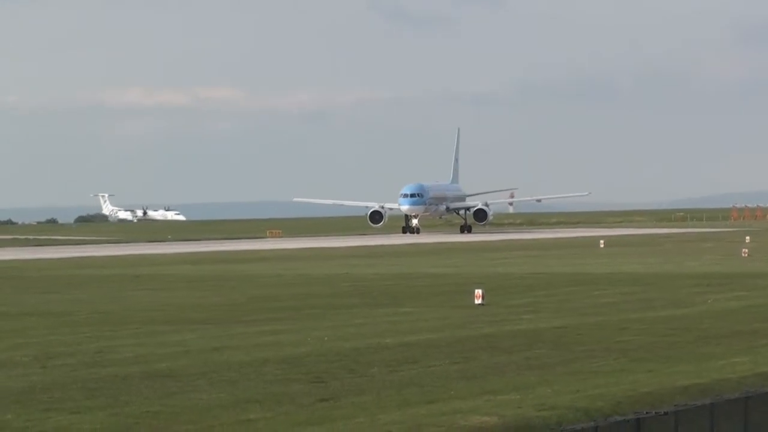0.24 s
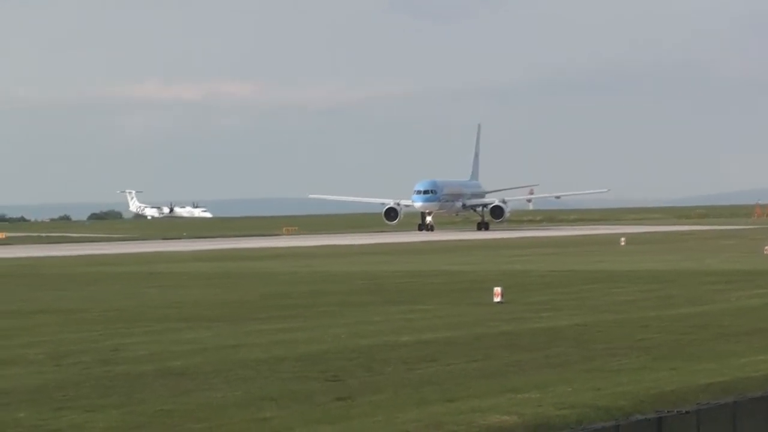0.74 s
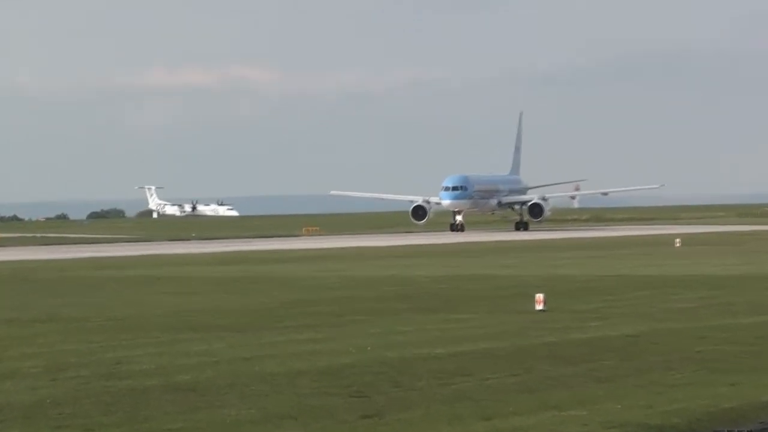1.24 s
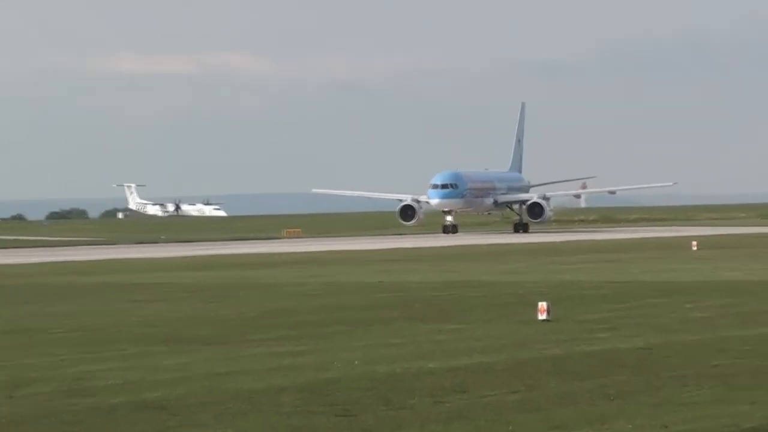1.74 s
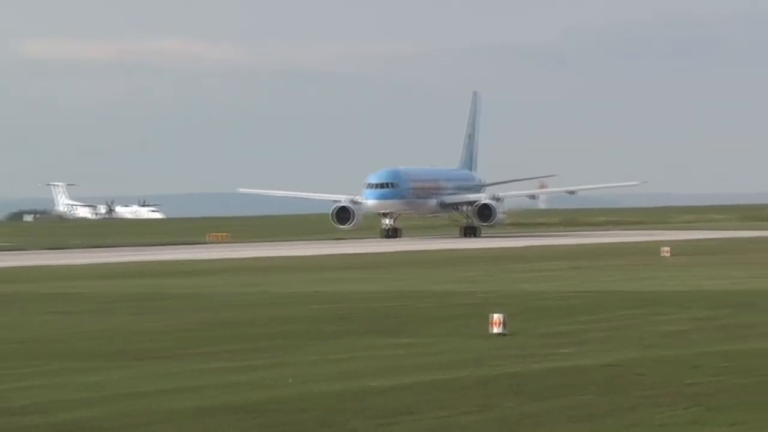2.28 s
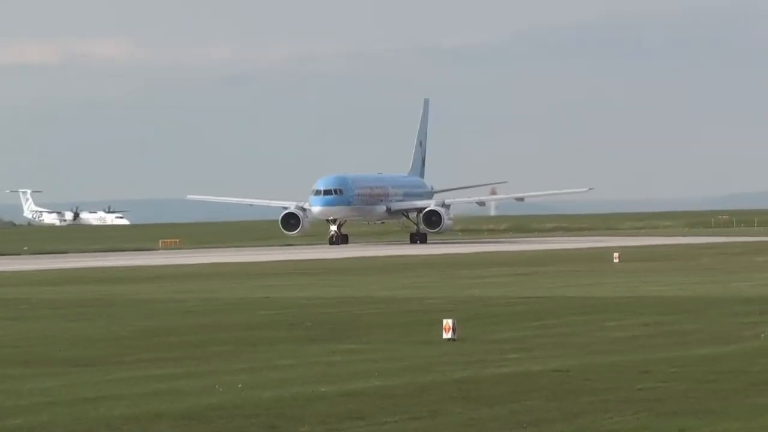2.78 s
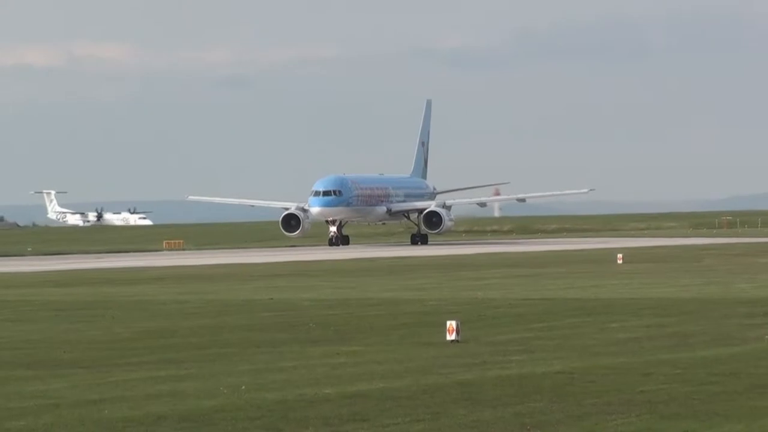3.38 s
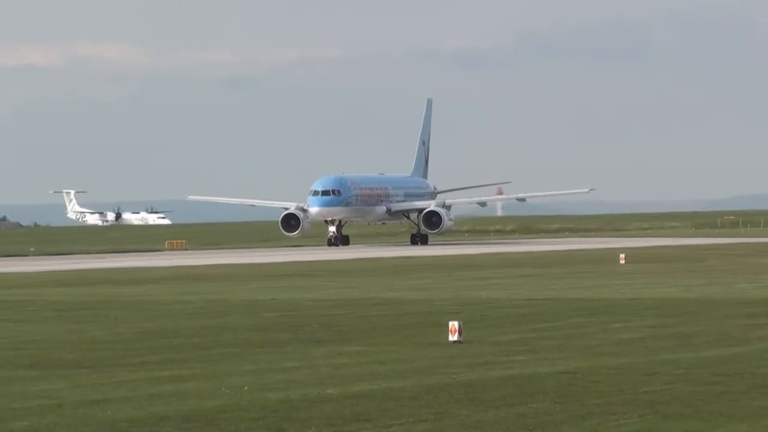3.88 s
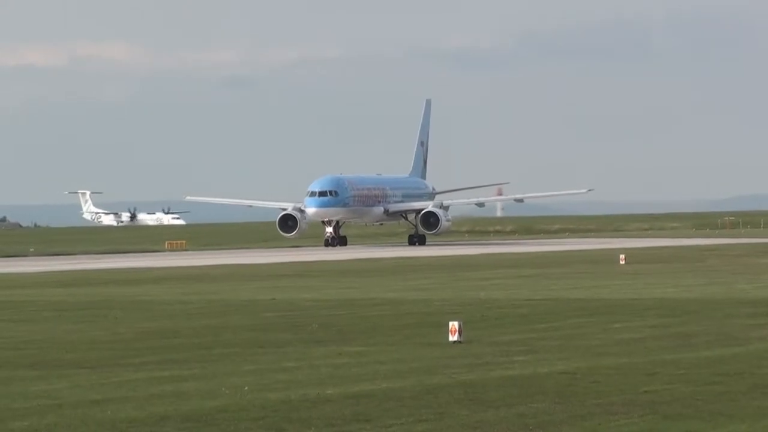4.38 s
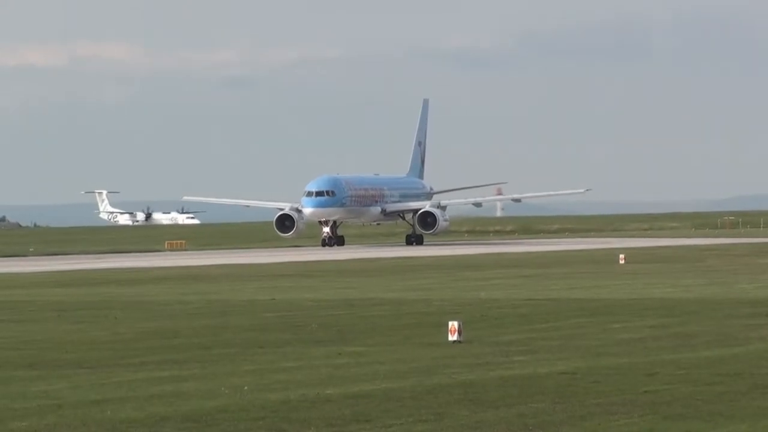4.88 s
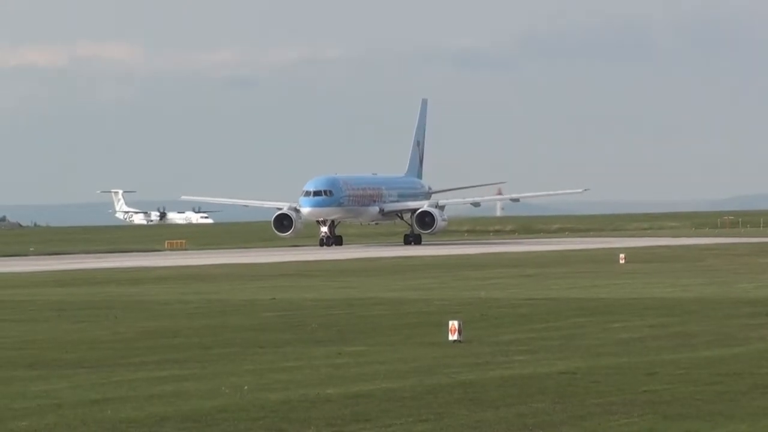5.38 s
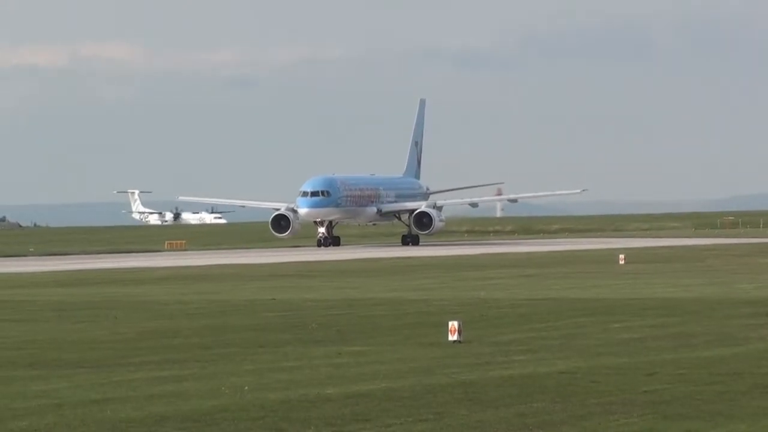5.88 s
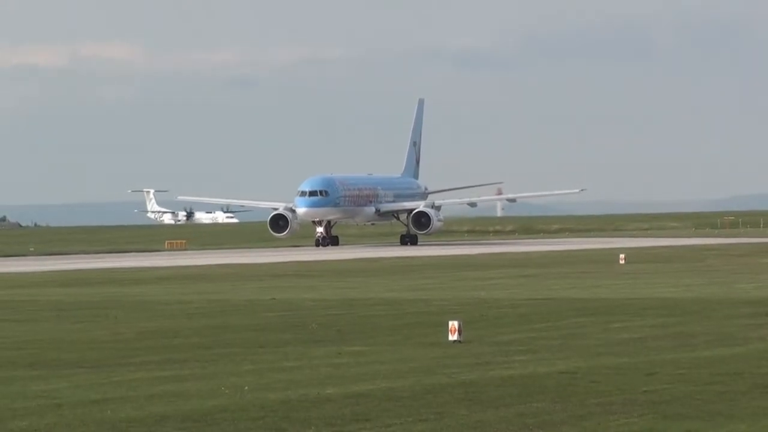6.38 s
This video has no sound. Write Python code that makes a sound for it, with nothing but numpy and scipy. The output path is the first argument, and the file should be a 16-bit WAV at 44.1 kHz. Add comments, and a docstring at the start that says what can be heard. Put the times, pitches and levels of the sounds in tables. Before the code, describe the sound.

Strong gusty wind buffets and pops on an unprotected microphone while a distant twin-jet airliner runs its engines with a thin, wavering high whine.

```python
"""A twin-jet airliner runs its engines up on a runway, a few hundred metres away, in gusty wind.
From the start filtered-noise roar and intake hiss carry a whine of wandering blade tones; gusts rumble over them,
eddies pop on two microphone ports, thickest in the first two seconds, and dry noise ticks fall mostly early.
The engines swell until past three seconds as a faint wide hiss rises, then sag after four.
They return towards the end, while the gusts, random kicks coloured low and lumpy, keep coming."""
import sys
import numpy as np
from scipy import signal
from scipy.fft import rfft, irfft, next_fast_len
from scipy.io import wavfile
from scipy.ndimage import uniform_filter1d, map_coordinates

SR = 44100
rng = np.random.default_rng(int(sys.argv[2]) if len(sys.argv) > 2 else 0)


def bounce(signal):
    """Save signal as a 16-bit WAV file at the path given by the first command-line argument."""
    frames = np.transpose(np.atleast_2d(signal))
    limited = np.clip(frames, -1, 1)
    pcm = np.round(limited * 32767).astype(np.int16)
    wavfile.write(sys.argv[1], SR, pcm)


N = 292868


# how strongly the air carries the engines, before the trims in the mix:
# (time [s], roar level [dB], intake hiss level [dB])
ENGINE_LEVELS = [(0.0, -49.5, -52.5), (0.28, -53.5, -53.5), (1.14, -48.5, -53.5), (1.52, -49, -53),
                 (1.66, -49.5, -53), (1.85, -52, -51), (2.11, -48, -47.5), (2.79, -46, -47),
                 (2.94, -46.5, -48.5), (3.16, -46, -44), (3.42, -48, -47), (3.5, -49.5, -49),
                 (3.62, -49, -49.5), (4.35, -46, -48), (4.41, -50, -53), (4.94, -51.5, -52),
                 (5.55, -50.5, -51), (5.68, -50.5, -49.5), (6.4, -47, -44.5), (6.64, -44.5, -48)]
# tone colour of the exhaust roar: (frequency [Hz], relative density [dB per Hz])
ROAR_SPECTRUM = [(60, -4), (300, 8.5), (700, 1), (1100, 3), (1400, 1), (2000, 1), (2400, -2.5), (2800, -5),
                 (3200, -13), (4500, -34.5), (8000, -59)]
# tone colour of the intake hiss: (frequency [Hz], relative density [dB per Hz])
INTAKE_SPECTRUM = [(2200, -25), (3000, -8), (3300, -1), (3700, -1), (4100, -5), (4500, -7.5), (4800, -11),
                   (5300, -16), (6000, -18.5), (6800, -28.5), (9000, -35.5), (12000, -53)]
# engine sound at the two ports: (frequency [Hz], coherence [0-1], left minus right [dB], left lead [rad])
ENGINE_PORTS = [(200, 0.38, -7.5, 0.016), (1000, 0.56, -7, 0.21), (2000, .68, -4.5, 0.079),
                (3000, 0.81, -8, .1), (3800, .88, -7, .28), (5200, 0.69, -7, .25), (7000, .1, 4.5, 0.023)]


def jet_noise():
    """Exhaust roar and intake hiss, made patchy by the turbulent air on the way."""
    roar_db, intake_db = curves(ENGINE_LEVELS)
    roar_noise = patchy(depth_db=1.74, bin_count=4, frame_count=30)
    roar = heard(roar_noise, ROAR_SPECTRUM, ENGINE_PORTS)
    intake_noise = patchy(depth_db=1.6, bin_count=4, frame_count=24)
    intake = heard(intake_noise, INTAKE_SPECTRUM, ENGINE_PORTS)
    return amp(roar_db + 3.0) * roar + amp(intake_db - 4.5) * intake


# local swells and a few dips in the engine noise, some gliding in pitch: (time [s], half length [s],
# centre [Hz], half width [octaves], glide [octaves per s], gain before the noise is levelled [dB])
NOISE_SWELLS = [(1.205, 0.12, 2000, 0.14, 0, 4.5), (1.534, 0.06, 4600, .5, 0, 4),
                (2.03, .06, 2040, .07, 0, 3.5), (2.174, 0.078, 3460, 0.18, 0.078, 7),
                (2.178, 0.055, 1020, 0.083, 0, 6), (2.302, .09, 1930, .07, 0, 7),
                (2.649, 0.2, 2000, 0.081, 0, 3.5), (2.554, 0.69, 2460, 0.27, -0.33, 4),
                (3.36, .17, 3330, .055, -0.87, 9.5), (2.75, .25, 3720, .08, 0, 2.5),
                (3.87, .05, 5200, .25, 0, 3), (3.411, 0.046, 4400, 0.087, 0, 9),
                (3.36, 0.18, 1000, .17, -0.03, 10), (4.096, 0.32, 1098, 0.16, 0, 7.5),
                (3.661, .09, 1890, .2, 0.076, -4), (2.67, .025, 2040, .04, -1, 6),
                (2.78, .1, 5900, .2, 0, -3), (3.56, .04, 5500, .3, 0, -3),
                (4.608, 0.083, 3390, .04, -0.067, 11), (4.9, .15, 5500, 0.22, 0, 2),
                (4.949, 0.27, 2110, .22, 0, -3.5), (5.52, 0.07, 2000, 0.14, .5, 5),
                (5.953, 0.076, 2400, 0.098, 0, 6.5), (6.248, 0.12, 3760, .12, -.7, 7.5),
                (6.421, .12, 5200, .15, 0, 2.5)]


def patchy(depth_db, bin_count, frame_count):
    """Two noises whose gain drifts in patches of time and frequency, with marked swells and dips."""
    hz, t, bins = signal.stft(rng.standard_normal((2, N)), SR, nperseg=512)
    field = rng.standard_normal(bins.shape[1:])
    for _ in range(2):
        field = uniform_filter1d(field, bin_count, 0)
        field = uniform_filter1d(field, frame_count, 1)
    gain_db = depth_db * unit(field)
    for s, length, centre_hz, width, glide, db in NOISE_SWELLS:
        octaves = np.log2((hz[:, None] + 1) / centre_hz) - glide * (t - s)
        gain_db = gain_db + db * np.exp(-((t - s) / length) ** 2 - (octaves / width) ** 2)
    return signal.istft(bins * amp(gain_db), nperseg=512)[1][:, :N]


# two shafts settle at their own pace; only each pitch against its median is played:
# (time [s], fan tone [Hz], compressor tone [Hz])
SHAFT_PITCH = [(0, 1838.5, 4540), (1.5, 1837, 4531), (2.7, 1835.5, 4523), (4.5, 1833.5, 4520),
               (6.64, 1831.5, 4517)]
# main tones, pitched at median shaft speed: name -> (shaft, frequency [Hz], pitch wander [Hz],
# offset of a beating side tone [Hz], its level against the direct tone [dB], scattered share [ratio])
MAIN_TONES = {"fan": ("fan", 1835, 4, 19, -16, .45), "shaft": ("fan", 1985, 3, 20, -16, .28),
              "upper shaft": ("fan", 2093, 3.5, -23, -6, .28), "fan octave": ("fan", 3669, 3, 38, -11, .26),
              "blade": ("fan", 3890, 3, 33, -12, .3),
              "fan side tone": ("compressor", 3969, 2.5, 38, -10, .3),
              "low compressor": ("compressor", 4181, 4, -35, -16, .27),
              "other engine's low compressor": ("compressor", 4208, 5, 35, -20, .4),
              "middle compressor": ("compressor", 4343, 2.5, 20, -16, .35),
              "high compressor": ("compressor", 4522, 2, 14, -25, .14),
              "turbine": ("compressor", 5277, 5, 20, -12, .42)}
# weaker tones of the fan shaft, before the trim in the mix: (frequency [Hz], level [dB])
WEAK_TONES = [(2070, -72), (2178, -73), (2266, -74), (3600, -71), (3709, -73), (3842, -67), (4146, -69.5),
              (5451, -84.5), (6010, -93)]
# each tone is beamed its own way and drifts as the aircraft turns: name -> (level at mid-scene with
# average intake hiss [dB], follow [dB per dB of intake hiss], drift [dB per s])
TONE_BEAMS = {"fan": (-60.5, 0.62, 0), "shaft": (-66, 1, -.3), "upper shaft": (-69.5, 1.1, -.5),
              "fan octave": (-61.5, 1.58, -1), "blade": (-63.5, 1.1, -.4),
              "fan side tone": (-64.5, 0.65, .6), "low compressor": (-61, 1, 1),
              "other engine's low compressor": (-66.5, .8, 2), "middle compressor": (-73.5, .6, 2.6),
              "high compressor": (-65.5, 0.4, 1.9), "turbine": (-79, 2.1, 0)}


def whine():
    """Blade tones sink slightly as the shafts settle; two engines a little apart in speed make them beat."""
    fan_hz, compressor_hz = curves(SHAFT_PITCH)
    speed = {"fan": fan_hz / np.median(fan_hz), "compressor": compressor_hz / np.median(compressor_hz)}
    intake_db = curves(ENGINE_LEVELS)[1]
    carry_db = intake_db - intake_db.mean()
    from_middle_s = (np.arange(N) - N / 2) / SR
    strong = 0
    for name, (shaft, hz, wander_hz, offset_hz, twin_db, scatter) in MAIN_TONES.items():
        db, follow, drift = TONE_BEAMS[name]
        level_db = db + follow * carry_db + drift * from_middle_s + flare_db(name)
        twin_phase = 2 * np.pi * np.cumsum(offset_hz + 4 * wobble(12)) / SR
        twin = amp(twin_db) * np.exp(1j * twin_phase)
        voice = tone(hz, speed[shaft], wander_hz, fade_db=1.5, scatter=scatter, twin=twin)
        strong = strong + amp(level_db) * voice
    weak = 0
    for hz, db in WEAK_TONES:
        weak = weak + amp(db) * tone(hz, speed["fan"], wander_hz=3.6, fade_db=3.5, scatter=0.45)
    return strong + weak * amp(1.1 * carry_db + 2.2)


def tone(hz, speed, wander_hz, fade_db, scatter, twin=0):
    """One blade tone at both ports: turbulence blurs its pitch and makes it twinkle."""
    phase = 2 * np.pi * np.cumsum(hz * speed + wander_hz * wobble(45)) / SR
    direct = amp(fade_db * wobble(14))
    # sound scattered by eddies arrives with shifting phase and beats against the direct path
    shared = wobble(70) + 1j * wobble(70)
    own_to_each_port = np.array([wobble(30), wobble(30)])
    scattered = scatter * (shared + own_to_each_port)
    _, balance_db, lead = along(ENGINE_PORTS, hz)
    tilt = amp(balance_db / 2) * np.exp(.5j * lead)
    ports = np.array([[tilt], [1 / tilt]])
    return unit(np.real(ports * (direct + twin + scattered) * np.exp(1j * phase)))


# moments when one tone rings out or drops away: (middle [s], half length [s], tone name, gain [dB])
TONE_FLARES = [(1.4, .14, "fan", 6), (2.24, 0.056, "fan", 10.5), (2.8, 0.44, "fan", 2.5),
               (3.47, .07, "fan", 4), (3.63, .07, "fan", -10), (3.874, 0.053, "fan", 10.5),
               (4.02, 0.068, "fan", 5.5), (4.7, 0.14, "fan", -6), (5.33, .075, "fan", 7),
               (5.5, 0.055, "fan", 6.5), (5.76, 0.14, "fan", -7), (6.47, 0.18, "fan", 3.5),
               (2.09, 0.091, "shaft", 9), (2.6, .25, "shaft", 2), (5.63, 0.11, "shaft", 5),
               (2.1, .11, "upper shaft", 6), (2.62, 0.17, "upper shaft", 11), (2.92, .12, "upper shaft", 9),
               (0.597, 0.12, "fan octave", 7.5), (1.102, .07, "fan octave", -9),
               (1.41, 0.19, "fan octave", 11.5), (1.84, .05, "fan octave", 3),
               (2.308, .03, "fan octave", -3), (2.437, .08, "fan octave", 5.5),
               (2.72, 0.17, "fan octave", 6.5), (2.97, 0.076, "fan octave", 7.5),
               (3.2, 0.13, "fan octave", 5.5), (3.52, 0.04, "fan octave", 6), (1.57, 0.11, "blade", 10),
               (2.65, .3, "blade", 3), (0.194, 0.15, "fan side tone", 9), (1.126, .07, "fan side tone", 9),
               (3.8, .13, "turbine", 6), (3.87, .05, "turbine", 4), (.2, .25, "low compressor", -3),
               (2.3, 0.13, "low compressor", 8.5), (2.753, 0.35, "low compressor", 3.5),
               (3.238, 0.1, "low compressor", 5.5), (3.64, .04, "low compressor", -9),
               (4.03, 0.05, "low compressor", 9), (4.203, 0.061, "low compressor", 6),
               (4.47, 0.038, "low compressor", 7), (5.067, .04, "low compressor", 8),
               (5.722, 0.092, "low compressor", 7), (6.33, .06, "low compressor", -5),
               (6.49, .05, "low compressor", 2), (1.99, .08, "high compressor", 6.5),
               (3.2, .12, "high compressor", 4.5), (3.415, .045, "high compressor", 11.5),
               (3.62, 0.07, "high compressor", -7), (3.87, 0.044, "high compressor", 3),
               (4.7, .06, "high compressor", 5.5), (5.5, .2, "high compressor", -4),
               (6.08, 0.09, "high compressor", 8), (6.26, .04, "high compressor", -5),
               (6.53, .19, "high compressor", 8.5)]
FLARE_EDGE_S = 0.02  # time scale of the move into and out of a flare


def flare_db(name):
    """Now and then the air focuses one tone on the listener or bends it away: it moves, holds, comes back."""
    t = np.arange(N) / SR
    total_db = 0
    for s, length, which, db in TONE_FLARES:
        if which == name:
            total_db = total_db + db * (1 + np.tanh((length - np.abs(t - s)) / FLARE_EDGE_S)) / 2
    return total_db


# gusts, before lumps and trims: (start [s], hold [s], buffet level [dB], flutter against buffet [dB])
WIND_GUSTS = [(0.0, 0.19, -26, -8), (0.351, 0.049, -19, -12), (0.546, 0.29, -23.5, -8.5),
              (0.919, 0.11, -24, -7), (1.151, 0.21, -23.5, -11.5), (1.446, 0.14, -24, -5.5),
              (1.791, 0.028, -30, -11.5), (1.908, 0.08, -25, -12), (2.068, 0.084, -31, -11),
              (2.205, 0.073, -25, -9), (2.3, 0.12, -28, -7), (2.511, 0.007, -33.5, -1.5),
              (2.79, .04, -27.5, -8), (2.886, 0.083, -22.5, -7.5), (3.056, 0.23, -30, -10.5),
              (3.383, 0.068, -19.5, -13), (3.524, 0.08, -25.5, -12.5), (3.835, 0.055, -24.5, -12.5),
              (3.974, 0.13, -24.5, -14), (4.175, 0.089, -25.5, -16), (4.325, 0.062, -20.5, -10),
              (4.42, 0.35, -26.5, -11), (4.857, 0.095, -29.5, -11.5), (5.036, 0.16, -29, -12.5),
              (5.254, 0.33, -26.5, -16), (5.484, 0.27, -27, -13.5), (5.812, 0.18, -25.5, -15),
              (6.064, 0.14, -22.5, -13.5), (6.267, 0.098, -22, -10.5), (6.428, 0.14, -22.5, -11.5)]
# tone colour of the deep buffet: (frequency [Hz], relative density [dB per Hz])
BUFFET_SPECTRUM = [(8, -16.5), (25, -14), (55, -5), (95, 1), (150, 0), (250, -8), (400, -22), (800, -36.5),
                   (2000, -88.5)]
# tone colour of the sharper flutter: (frequency [Hz], relative density [dB per Hz])
FLUTTER_SPECTRUM = [(100, -22.5), (220, -1), (330, 1), (480, -3.5), (750, -13.5), (1200, -22),
                    (2500, -30.5), (5000, -45), (9000, -76.5)]
# wind at the two ports: (frequency [Hz], coherence [0-1], left minus right [dB], left lead [rad])
WIND_AT_PORTS = [(20, .65, -12.5, -.2), (50, 1, -10.5, -0.79), (101, 0.73, -2, -0.73),
                 (175, 0.56, 2, -0.93), (270, 0.26, 6, -0.095), (500, .45, 4, -0.063),
                 (1500, 0.4, 5.5, -0.22)]
BREEZE_DB, BREEZE_FLUTTER_DB = -33, -43  # floor between gusts, before lumps and trims


def wind():
    """Eddies break on the ports: a deep buffet, and sharper kicks that flutter above it; the strongest flow rules."""
    buffet_gain, flutter_gain = amp(BREEZE_DB), amp(BREEZE_FLUTTER_DB)
    for start, length, db, flutter_db in WIND_GUSTS:
        gust = amp(db) * gust_shape(start, length)
        buffet_gain = np.maximum(buffet_gain, gust)
        flutter_gain = np.maximum(flutter_gain, gust * amp(flutter_db))
    kicks = eddies(rate=480, spread_db=3)
    buffet = heard(0.48 * kicks + rng.standard_normal((2, N)), BUFFET_SPECTRUM, WIND_AT_PORTS)
    flutter = heard(kicks + 0.51 * rng.standard_normal((2, N)), FLUTTER_SPECTRUM, WIND_AT_PORTS)
    lumps_db = 1.72 * wobble(40) + stall_db()
    return amp(lumps_db - 0.32) * buffet_gain * buffet + amp(lumps_db - 0.08) * flutter_gain * flutter


GUST_ATTACK_S, GUST_RELEASE_S = 0.093, 0.074  # time constants of build-up and dying away


def gust_shape(start, length):
    """A gust builds up exponentially, holds and dies away."""
    t = np.arange(N) / SR
    before = np.maximum(start - t, 0)
    after = np.maximum(t - start - length, 0)
    return np.exp(-before / GUST_ATTACK_S - after / GUST_RELEASE_S)


def eddies(rate, spread_db):
    """Random pressure kicks of either sign, rate a second at each port, some much larger than the rest."""
    hit = rng.random((2, N)) < rate / SR
    size_db = spread_db * np.minimum(rng.standard_normal((2, N)), 2)
    return unit(hit * rng.choice([-1, 1], (2, N)) * amp(size_db))


# brief changes in the wind, nearly all lulls: (middle [s], half length [s], gain [dB])
WIND_LULLS = [(0.236, 0.016, -1), (0.49, 0.0062, -2.5), (1.126, 0.0057, -13), (1.723, 0.061, 0),
              (2.48, 0.015, -5), (2.674, 0.034, -3), (3.039, .02, -2.5), (3.174, 0.0072, -10),
              (3.725, 0.012, -10.5), (4.831, 0.044, 1)]
STALL_DB, STALL_S = 1, .009  # depth of the dip before a pop; its lead and half length


def stall_db():
    """The wind dips in the lulls, and the flow stalls for an instant before each hard eddy breaks."""
    lulls = sum(db * bump(s, length) for s, length, db in WIND_LULLS)
    return lulls - STALL_DB * sum(bump(s - STALL_S, STALL_S) for s, _, _ in HARD_EDDIES)


# the hardest eddies, each a pop on the ports:
# (time [s], peak level before a 2 dB lift and panning [dB], twice the left minus right [dB])
HARD_EDDIES = [(0.0171, -17, 15.5), (0.1777, -20.5, 14), (0.2848, -16.5, 8), (0.298, -13, 14),
               (0.359, -23, 4), (0.3954, -16, 20), (0.57, -18, 3), (0.666, -13.5, -5), (0.8356, -15.5, 24),
               (0.9008, -18, 1), (0.9458, -17, 0), (1.0271, -19, 19), (1.066, -19, 9), (1.1432, -20, 6),
               (1.1589, -21, 8), (1.197, -15, 11), (1.2367, -15.5, 4.5), (1.3131, -12, 10.5),
               (1.3277, -14, 14), (1.4416, -20.5, 8), (1.5402, -15, 12), (1.5664, -11.5, 9),
               (1.8049, -21, 12), (1.8959, -21.5, 10), (1.9218, -18, 9), (2.509, -21, 5),
               (2.8643, -17.5, 0), (3.367, -16, 11), (3.462, -13, 13), (3.6402, -21, 7),
               (3.8586, -16.5, 14), (3.9712, -17, 17), (4.0345, -18.5, 14), (4.244, -20.5, 10),
               (4.3832, -16, 19), (4.5185, -20.5, 3), (4.6669, -19, 5), (4.6994, -19, 5),
               (4.7634, -18.5, 11), (4.8869, -17.5, 4), (4.947, -24.5, 13), (5.2842, -18, 13),
               (5.581, -22, 8), (5.8449, -16.5, 15), (6.0697, -17.5, 17), (6.1905, -18, 13),
               (6.2728, -14.5, 15), (6.3538, -16.5, 25), (6.5184, -19.5, -2)]
CRACKLE_DB, CRACKLE_S = -30, 0.0026  # fine turbulence: level against the spike, decay time constant


def pops():
    """A hard eddy is one sharp pressure spike between two shallow dips, with a brief crackle on top."""
    out, t = np.zeros((2, N)), np.arange(-SR // 100, SR // 100) / SR
    from_tip = np.hypot(t - .0015, .00016)  # seconds, rounded at the tip
    spike = np.exp(-from_tip / 0.00081) - np.exp(-from_tip / 0.0019) / 2
    spike = spike / spike.max()
    band = signal.butter(3, [600, 2400], "bandpass", fs=SR, output="sos")
    for s, db, pan_db in HARD_EDDIES:
        grain = unit(signal.sosfilt(band, rng.standard_normal((2, len(t)))))
        crackle = amp(CRACKLE_DB) * np.exp(-from_tip / CRACKLE_S) * grain
        port_db = db + 2 + np.array([[pan_db], [-pan_db]]) / 4
        add(out, s + t[0], amp(port_db) * (spike + crackle))
    return out


# small ticks near the microphone: (time [s], starting rms level [dB], centre of an octave band [Hz])
DRY_TICKS = [(0.046, -53, 5500), (0.1715, -33, 2290), (0.297, -37, 1700), (0.298, -59, 5500),
             (0.3985, -58, 6000), (0.534, -45, 2590), (0.6965, -56, 6000), (0.699, -30.5, 1390),
             (1.0161, -53.5, 5960), (1.549, -56, 6000), (4.29, -33, 2380), (5.1347, -42, 2400),
             (5.635, -58, 7000)]
TICK_T60_S = 0.023  # time to fall by 60 dB


def ticks():
    """Tiny dry ticks, dull or bright, each a few milliseconds of decaying octave-band noise."""
    out, t = np.zeros((2, N)), np.arange(SR // 20) / SR
    for s, db, hz in DRY_TICKS:
        band = signal.butter(5, hz * np.sqrt([.5, 2]), "bandpass", fs=SR, output="sos")
        grain = unit(signal.sosfilt(band, rng.standard_normal((2, len(t)))))
        add(out, s, amp(db - 60 * t / TICK_T60_S) * grain)
    return out


# the faint hiss, before the trim in the mix: (time [s], level [dB])
HISS_LEVELS = [(0.05, -84), (2.07, -84.5), (2.69, -81), (4.36, -77), (4.39, -82.5), (5.5, -80),
               (6.23, -77.5), (6.64, -78.5)]
# its tone colour: (frequency [Hz], relative density [dB per Hz])
HISS_SPECTRUM = [(3000, -5.5), (7000, 2), (10000, -3.5), (11500, -1), (14300, -2.5), (15500, -9)]
# hiss at the two ports: (frequency [Hz], coherence [0-1], left minus right [dB], left lead [rad])
HISS_AT_PORTS = [(1000, .1, -5.5, 0.0098)]


def hiss():
    """A faint, wide hiss above the engines: coloured noise, nearly unrelated at the two ports."""
    noise = heard(rng.standard_normal((2, N)), HISS_SPECTRUM, HISS_AT_PORTS)
    return amp(curves(HISS_LEVELS)[0] + 7.5) * noise


def heard(pair, spectrum, ports):
    """Colour two unrelated signals and share them between the ports; their middle has rms 1."""
    m = next_fast_len(N + 8192)
    hz = np.fft.rfftfreq(m, 1 / SR)
    common, apart = rfft(pair, m) * amp(along(spectrum, hz)[0])
    alike, balance_db, lead = along(ports, hz)
    turn = np.arccos(np.clip(alike, 0, 1)) / 2  # sets the coherence
    tilt = amp(balance_db / 2) * np.exp(.5j * lead)
    common, apart = common * np.cos(turn), apart * np.sin(turn)
    out = irfft(np.array([(common + apart) * tilt, (common - apart) / tilt]), m)[:, :N]
    return out / np.std(out.mean(axis=0))


def along(points, hz):
    """Each column of a table after its frequency, read on a log axis."""
    f, *cols = np.transpose(points)
    return [np.interp(np.log(hz + 1), np.log(f + 1), c) for c in cols]


def curves(rows):
    """One value per sample for each column after the time."""
    s, *cols = np.transpose(rows)
    return [np.interp(np.arange(N) / SR, s, c) for c in cols]


def wobble(rate):
    """A smooth random curve, rate knots a second."""
    knots = rng.standard_normal(int(N * rate / SR) + 4)
    coarse = np.linspace(0, N, N // 32)
    smooth = map_coordinates(knots, [coarse * rate / SR])
    return np.interp(np.arange(N), coarse, smooth)


def bump(s, length):
    """A bell in time, 1 at s."""
    return np.exp(-np.minimum(np.square((np.arange(N) / SR - s) / length), 20))


def add(out, s, sound):
    """Mix a short stereo sound in at time s."""
    room = out[:, round(s * SR):][:, :sound.shape[1]]
    room += sound[:, :room.shape[1]]


def amp(db):
    """Decibels to gain."""
    return 10 ** (np.asarray(db) / 20)


def unit(x):
    """Scale to rms 1."""
    return x / np.sqrt(np.mean(x ** 2) + 1e-20)


def scene():
    """The distant airliner behind the wind."""
    return jet_noise() + whine() + wind() + pops() + ticks() + hiss()


TOP_HZ = 15700  # nothing is kept from here up


def record(dry):
    """A 6 ms fade-in opens the sound softly, and a steep band limit removes the extreme treble."""
    m = next_fast_len(N + 8192)
    opening = np.minimum(np.arange(N) / SR / .006, 1)
    kept = np.fft.rfftfreq(m, 1 / SR) < TOP_HZ
    return irfft(rfft(dry * opening, m) * kept, m)[:, :N]


dry = scene()
out = record(dry)
bounce(out)
```